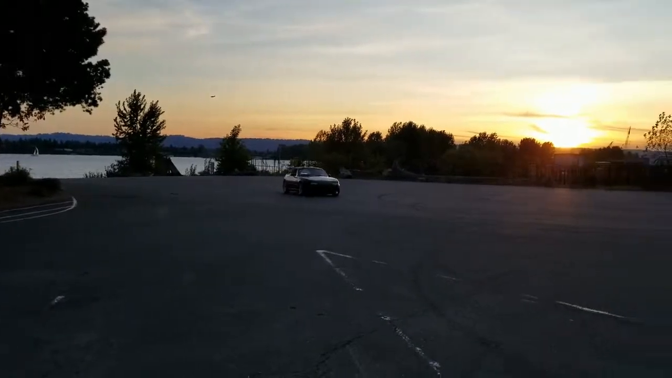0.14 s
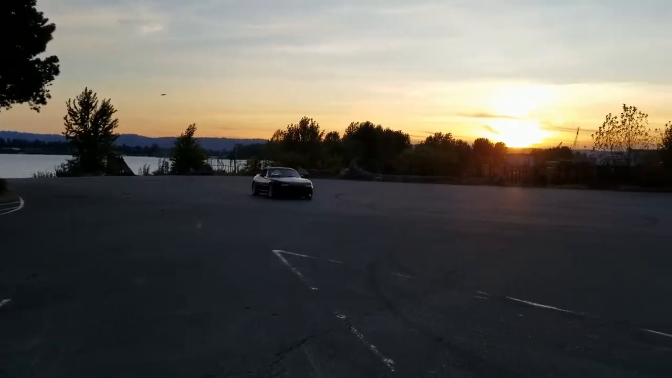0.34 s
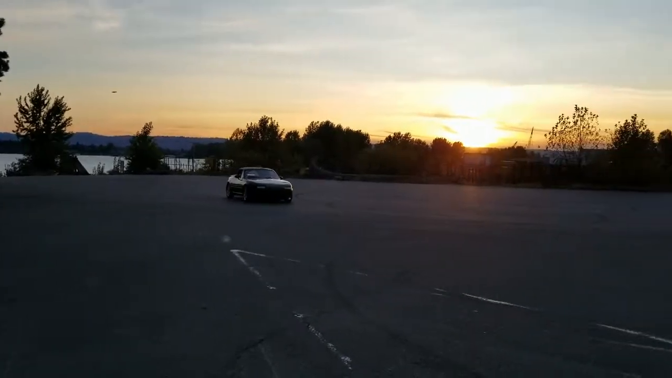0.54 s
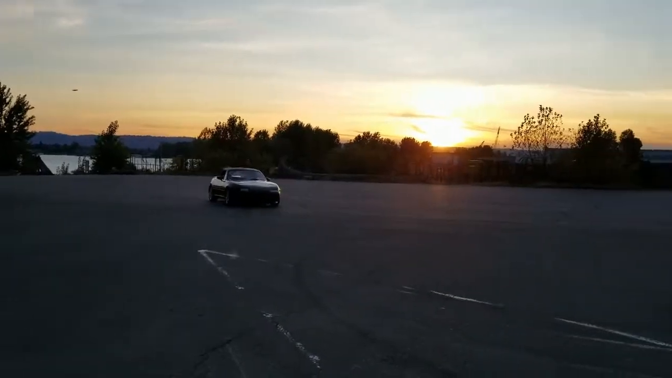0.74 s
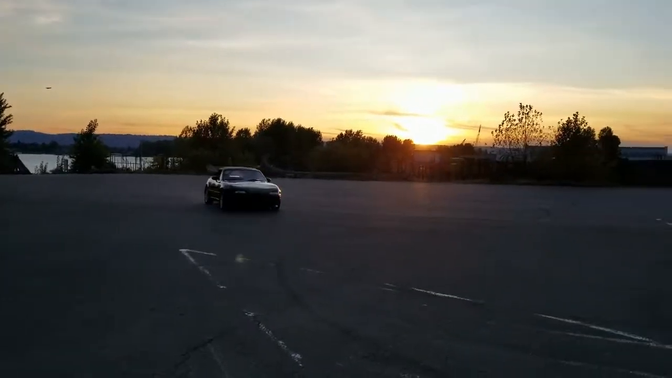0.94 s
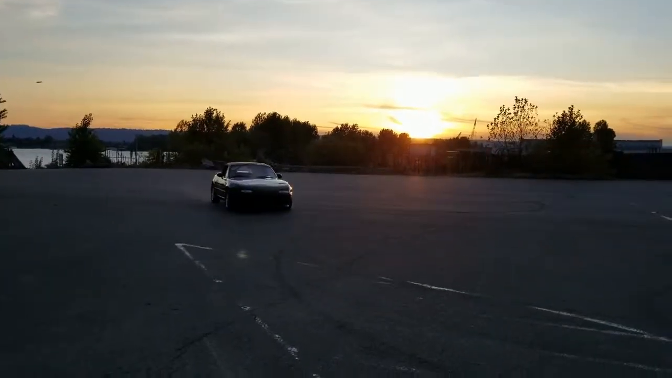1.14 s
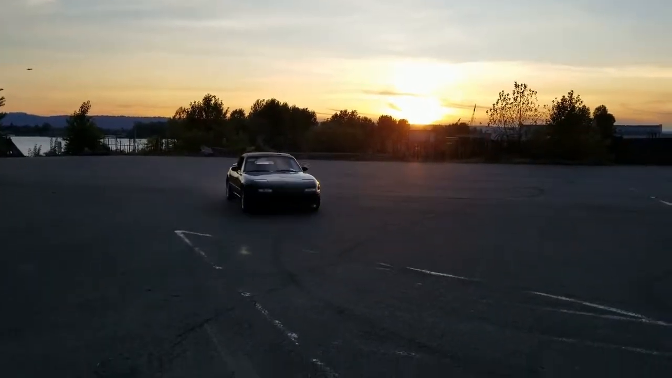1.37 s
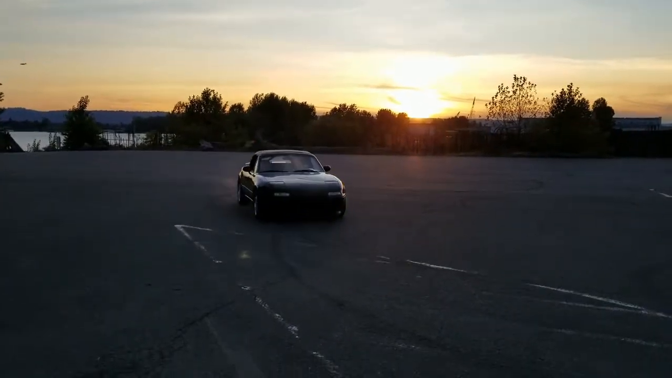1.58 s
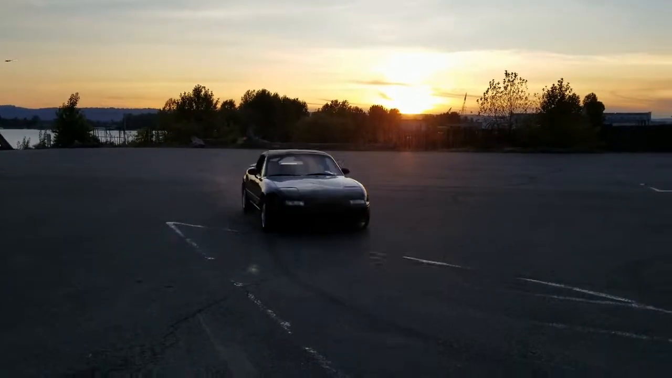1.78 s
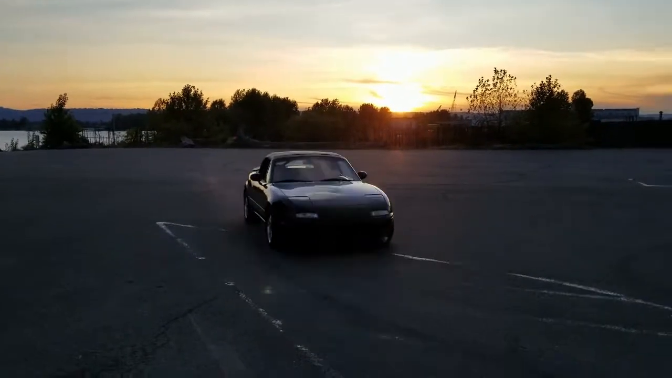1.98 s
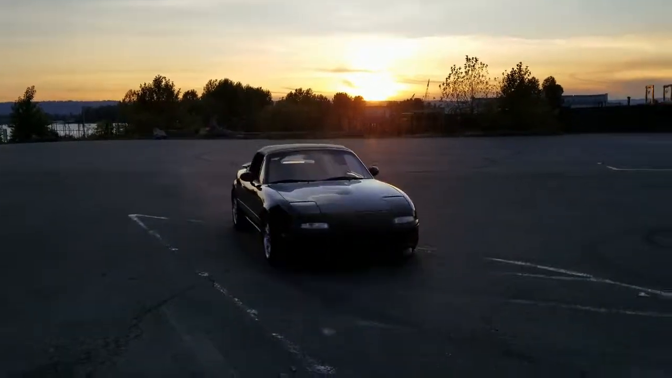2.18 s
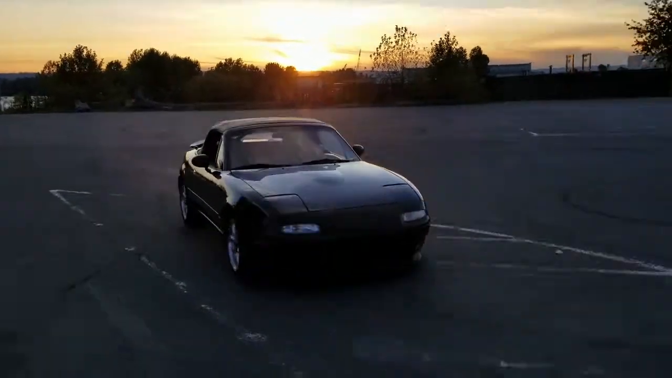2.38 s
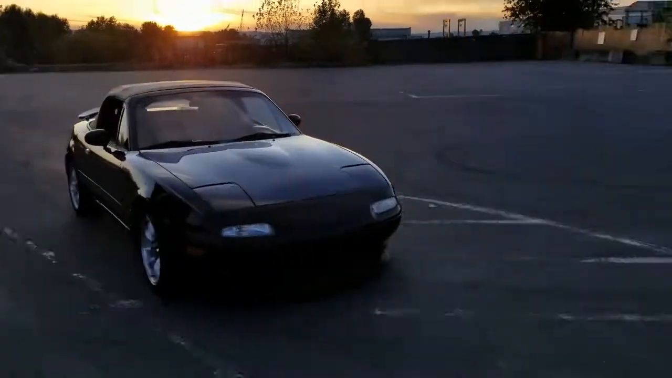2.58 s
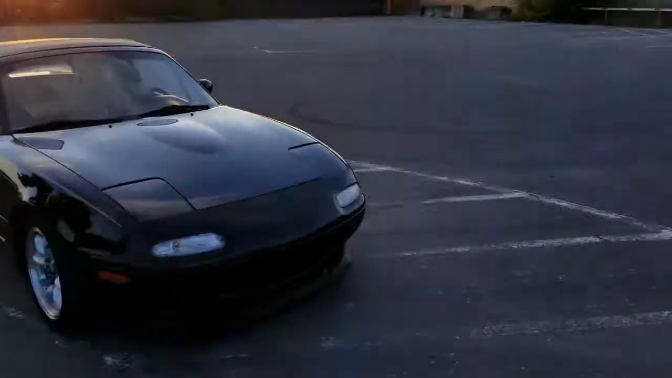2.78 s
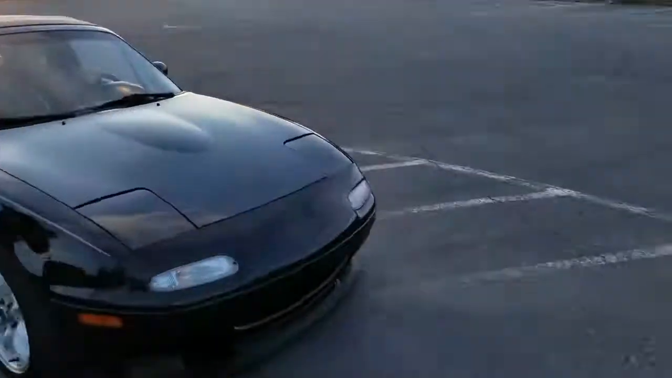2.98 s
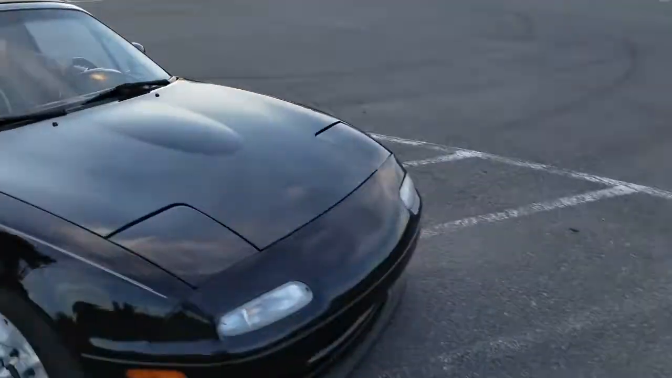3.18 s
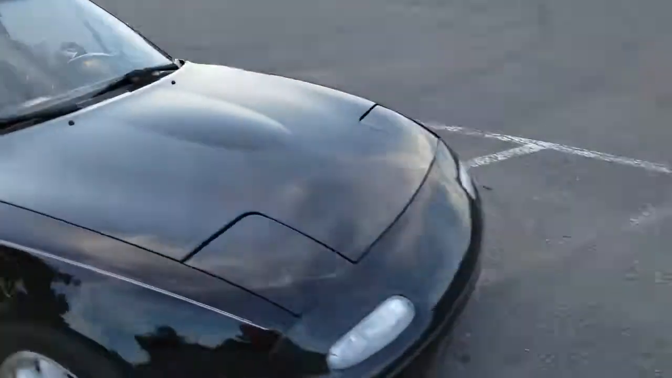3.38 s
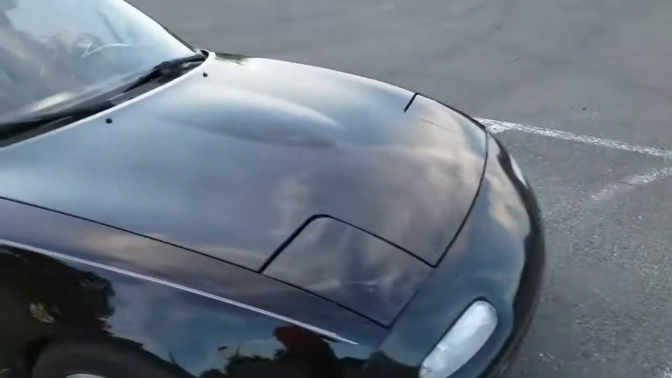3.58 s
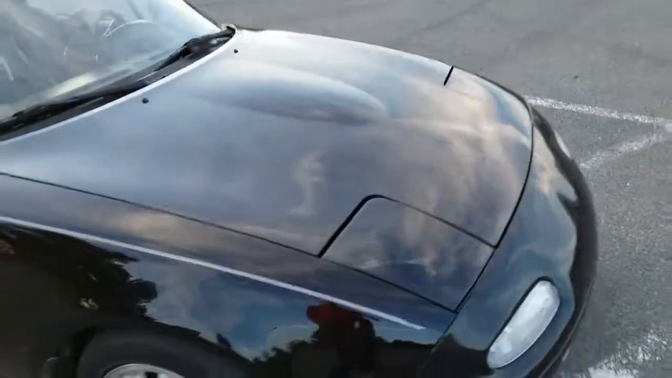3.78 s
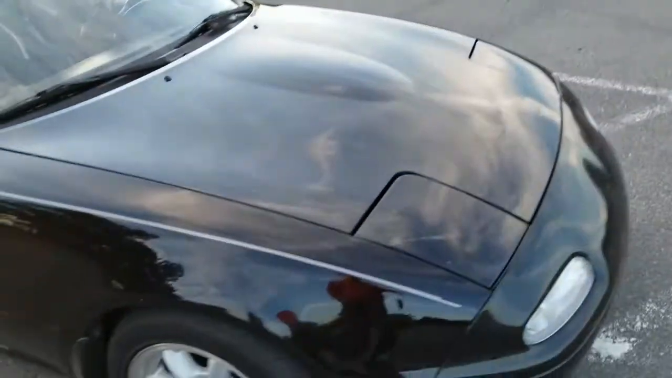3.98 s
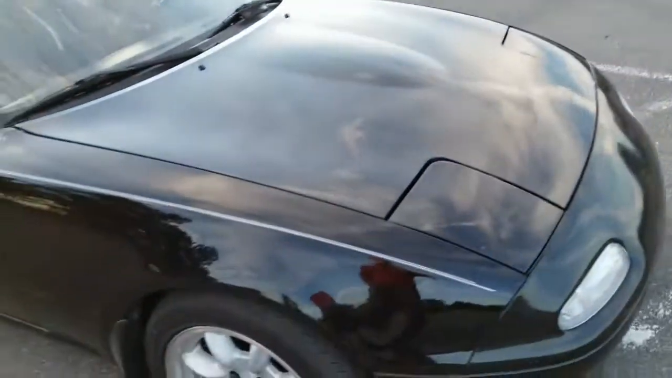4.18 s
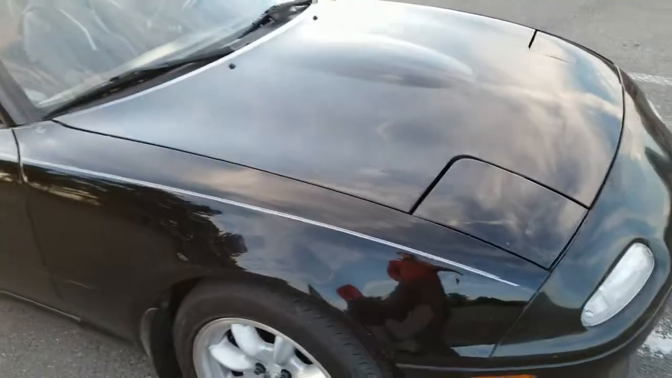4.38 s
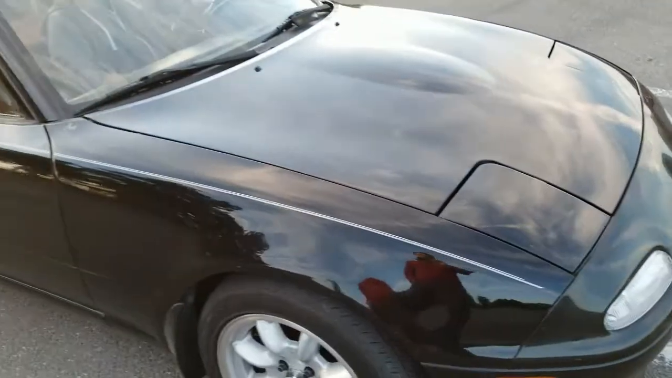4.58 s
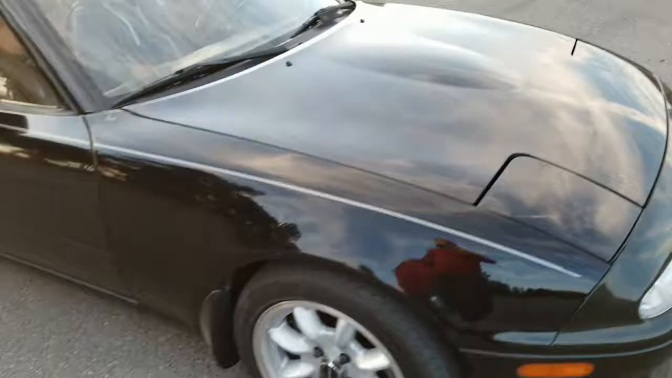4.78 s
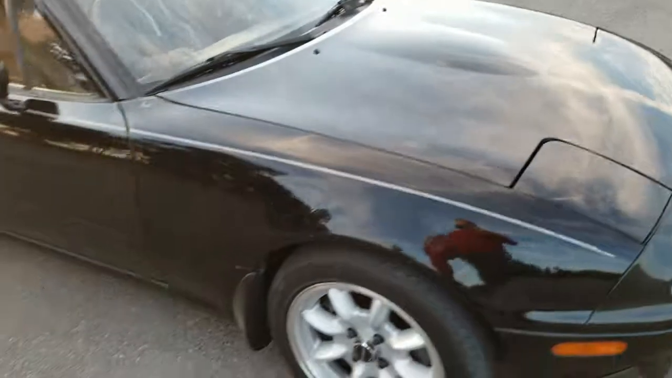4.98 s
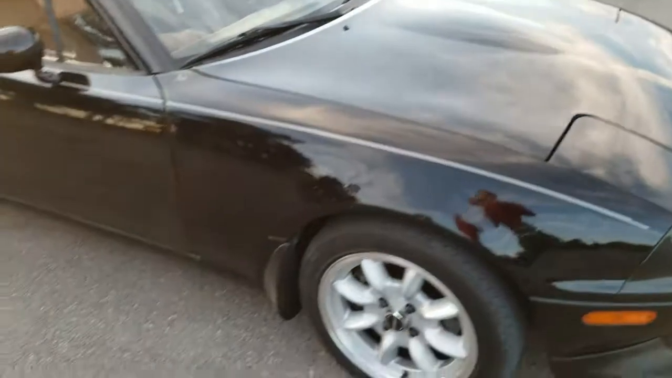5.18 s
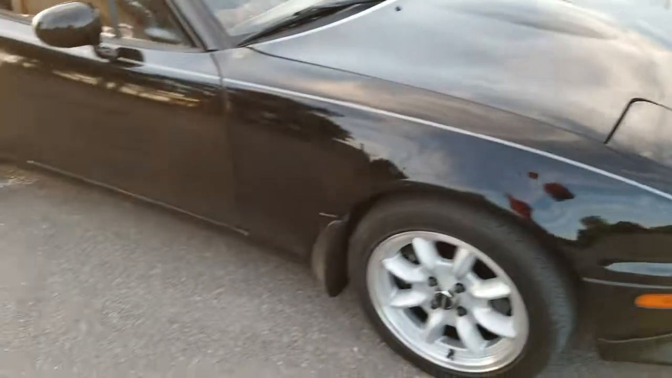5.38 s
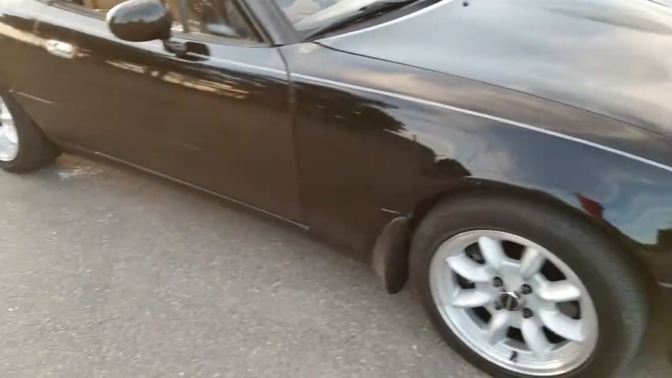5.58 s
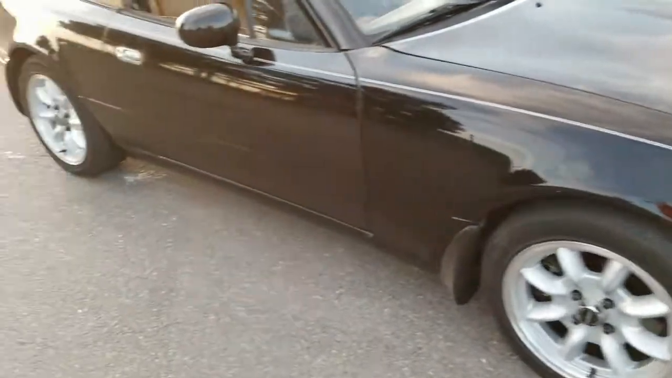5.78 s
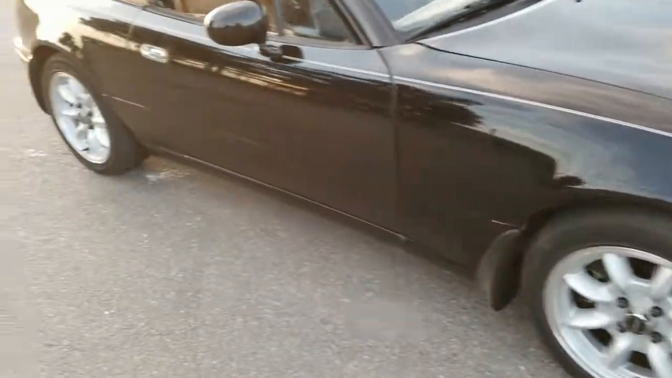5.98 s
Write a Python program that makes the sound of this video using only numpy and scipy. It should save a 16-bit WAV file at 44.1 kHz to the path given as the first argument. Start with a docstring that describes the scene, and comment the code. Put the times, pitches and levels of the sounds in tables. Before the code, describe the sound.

Low burbling engine note rises, drops as the car rolls up across an open lot, then idles unevenly nearby with hiss and a metal clack.

```python
"""Small eight-cylinder car coasting to idle

A car pulls, lifts off the throttle, coasts across an open lot and stops, idling, by a phone.
Crank-order tones and uneven firings ringing two pipes make the exhaust. Shaped noise makes the gas rasp,
tyre roll and engine-bay hiss; a pebble, clacks, whines and a squeak are short pulses and thin tones.
The two microphone ports hear the far car as one point and the near car as a wide source."""
import sys
import numpy as np
from scipy import signal
from scipy.fft import rfft, irfft
from scipy.io import wavfile
from scipy.ndimage import uniform_filter1d, map_coordinates

SR = 44100
rng = np.random.default_rng(int(sys.argv[2]) if len(sys.argv) > 2 else 0)


def digitize_waveform(pressure):
    """Quantize a signal to 16-bit integers and store it at the path in sys.argv[1].

    Rows of a 2-D input are taken as channels; values are limited to [-1, 1].
    """
    field = np.atleast_2d(pressure).T
    bounded = np.clip(field, -1, 1)
    quanta = np.round(bounded * 32767).astype(np.int16)
    wavfile.write(sys.argv[1], SR, quanta)


N = 266355
TIME = np.arange(N) / SR
PAD = 4096  # mirrored samples at each end of a filtered sound
HZ = np.fft.rfftfreq(N + 2 * PAD, 1 / SR) + 1  # 1 Hz up, so that its log and inverse exist
THROTTLE_SHUTS = (0.692, 0.07)  # start_s, length_s


def undb(db):
    """Decibels to gain."""
    return 10 ** (np.asarray(db) / 20)


def unit(x):
    """Scale to rms 1."""
    return x / np.sqrt(np.mean(x ** 2))


def curves(table):
    """Columns of a table, joined by straight lines in time."""
    s, *columns = np.transpose(table)
    return [np.interp(TIME, s, column) for column in columns]


def ramp(start_s, length_s):
    """Rise from 0 to 1 in a straight line."""
    return np.clip((TIME - start_s) / length_s, 0, 1)


def walk(rate_hz):
    """Random levels slewed from one to the next at a given rate; spread near 1."""
    hold = int(SR / rate_hz)
    steps = np.repeat(rng.standard_normal(N // hold + 1), hold)
    return 1.56 * uniform_filter1d(steps, hold)[:N]


def shape(x, response):
    """Multiply the spectrum; mirrored ends keep the edges quiet."""
    spectrum = rfft(np.pad(x, PAD, "reflect"))
    return irfft(spectrum * response, N + 2 * PAD)[PAD:-PAD]


def colour(x, points):
    """Equalise through (hz, gain_db) points on a log frequency axis."""
    hz, db = np.transpose(points)
    return shape(x, undb(np.interp(np.log(HZ), np.log(hz), db)))


def ring(x, modes, order=1):
    """Causal resonances (hz, width_hz, gain_db) summed in alternating polarity."""
    response = 0
    for k, (hz, width, db) in enumerate(modes):
        detune = (HZ / hz - hz / HZ) * hz / width
        response = response + (-1) ** k * undb(db) / (1 + 1j * detune) ** order
    return shape(x, response)


def ringing(modes, flicker_db):
    """Sheet-metal resonances shaken by noise, each flickering in level alone."""
    total = np.zeros(N)
    for mode in modes:
        body = unit(ring(rng.standard_normal(N), [mode]))
        total += body * undb(mode[2] + flicker_db * walk(30))
    return total


def strikes(table):
    """One impulse for each (start_s, peak_db) row."""
    x = np.zeros(N)
    for s, db in table:
        x[int(s * SR)] = undb(db)
    return x


def tone(table, waver, octave_db):
    """A thin tone of wavering pitch and its octave along the table's rows, silent outside them."""
    hz, db = curves(table)
    on = (TIME > table[0][0]) & (TIME < table[-1][0])
    phase = 2 * np.pi * np.cumsum(hz * (1 + waver * walk(60))) / SR
    wave = np.sin(phase) + undb(octave_db) * np.sin(2 * phase)
    return on * np.sqrt(2) * undb(db) * wave


def tyre_roll():
    """Tyres on tarmac: coloured noise with flickering underbody resonances."""
    # loudness of the roll: start_s, level_db
    roll_level = [(0, -40), (.4, -37.5), (1.6, -39.5), (2.4, -41), (3.2, -47.5), (3.6, -52), (6.04, -62)]
    # colour of tyre noise: hz, gain_db
    roll_colour = [(210, -31), (350, 1), (620, 0), (824, -11), (1150, -6.5), (1460, -17.5), (1790, -11.5),
                   (2040, -21.5), (2280, -15.5), (3280, -16), (5530, -25.5), (5990, -22), (8620, -50),
                   (13000, -35), (15500, -43)]
    # underbody resonances: hz, width_hz, gain_db
    underbody = [(1180, 130, -15.5), (2276, 110, -20.5), (3206, 47, -22), (5800, 140, -29.5),
                 (6750, 85, -27), (7040, 120, -27.5), (7670, 190, -29.5)]
    roll = unit(colour(rng.standard_normal(N), roll_colour)) * undb(0.94 * walk(22))
    return (roll + ringing(underbody, 2.1)) * undb(curves(roll_level)[0])


def engine_bay(turns):
    """Engine-bay hiss: noise with valve-gear chatter in its treble, plus ringing covers and brackets."""
    # loudness of the bay: start_s, level_db
    bay_level = [(0, -71), (.5, -53), (1, -46), (2, -40.5), (2.8, -38), (3.6, -41), (5, -41.5), (6.04, -39)]
    # colour of bay noise: hz, gain_db
    bay_colour = [(210, -35), (350, 4), (397, -7), (423, 1), (537, -6.5), (681, -9), (936, -17),
                  (1150, -17), (1370, -18), (2170, -22.5), (4500, -26.5), (5710, -25.5), (8350, -42.5),
                  (12600, -27), (15500, -35)]
    # covers and brackets: hz, width_hz, gain_db
    tinware = [(722, 200, -11), (1122, 29, -20), (2305, 580, -14.5), (3036, 180, -22.5), (3544, 60, -27),
               (5900, 200, -22.5), (7450, 210, -24.5)]
    bay = unit(colour(rng.standard_normal(N), bay_colour))
    treble = colour(bay, [(2500, -23), (6000, 0)])
    top = colour(bay, [(8000, -30.5), (10500, -4.5)])
    # the valve gear chatters twice a turn, unevenly
    twice_a_turn = 2.0 * np.cos(4 * np.pi * turns)
    treble_chatter = undb(twice_a_turn + 2.0 * walk(110))
    top_chatter = undb(twice_a_turn + 2.0 * walk(110))
    hissing = (bay - treble) * undb(1.4 * walk(20))
    hissing += (treble - top) * treble_chatter + top * top_chatter
    return (hissing + ringing(tinware, 3.53)) * undb(curves(bay_level)[0])


def gas_rasp(turns, crank_hz):
    """Gas under throttle: noise that puffs once a firing, with flickering tailpipe resonances."""
    # colour of the gas: hz, gain_db
    rasp_colour = [(530, -41.5), (900, -15), (1040, 2), (1510, -36), (2120, -9.5), (3180, -7), (3880, -13),
                   (4470, -13.5), (6000, -31), (7800, -62), (13200, -120)]
    # tailpipe resonances: hz, width_hz, gain_db
    tailpipe = [(1000, 73, -8), (1135, 64, -8.5), (2050, 120, -11), (2620, 99, -11), (3260, 70, -11),
                (3780, 60, -9)]
    start_db, db_per_hz = -48, 0.94  # level at the opening crank speed, and its rise with speed
    depth = 0.79  # part of the noise amplitude that puffs
    puff = np.exp(-(4 * turns % 1) / 0.41)  # decays over each quarter turn
    gas = (1 - depth + depth * puff) * rng.standard_normal(N)
    rasp = unit(colour(gas, rasp_colour)) * undb(2 * walk(45)) + ringing(tailpipe, 2.9)
    level_db = start_db + db_per_hz * (crank_hz - crank_hz[0])
    return rasp * undb(level_db) * (1 - ramp(*THROTTLE_SHUTS))


def hiss(turns, crank_hz):
    """The broadband noise of the car, with fresh random noise on each call."""
    return tyre_roll() + engine_bay(turns) + gas_rasp(turns, crank_hz)


def pebble_snap():
    """A pebble snaps under a tyre: a very short damped 2200 Hz wave."""
    # the snap: start_s, peak_db
    pebble = [(1.83, -20)]
    t = np.arange(SR // 8) / SR
    snap = np.cos(2 * np.pi * 2200 * t) * np.exp(-t / 0.00024)
    return signal.fftconvolve(strikes(pebble), snap)[:N]


def metal_clacks():
    """Metal clacks in the car: damped modes and a short noise crack with a softened onset."""
    # the clacks: start_s, peak_db
    clack_hits = [(4.2433, -53), (4.4214, -37), (4.4794, -48), (5.3015, -23.5)]
    # modes of the metal: hz, gain_db, t60_s
    clack_modes = [(1760, 3, .07), (2196, 13, 0.05), (2600, 5, .02), (3120, 15, 0.05), (3500, 6, .02),
                   (3950, 9, .03), (4300, 3, 0.03), (5000, 0, 0.02)]
    t = np.arange(SR // 8) / SR
    modes = sum(undb(db) * np.sin(2 * np.pi * hz * t) * 1000. ** (-t / t60) for hz, db, t60 in clack_modes)
    crack = undb(16) * np.diff(rng.standard_normal(len(t) + 1)) * np.exp(-t / 0.008)
    clack = (modes + uniform_filter1d(crack, size=6)) * (1 - np.exp(-t / 0.0027))
    return signal.fftconvolve(strikes(clack_hits), clack / clack.max())[:N]


def whines_and_squeak():
    """Thin gliding tones of wavering pitch, each with a faint octave."""
    # a gear whine: start_s, pitch_hz, level_db
    gear_whine = [(1.25, 1870, -70), (1.5, 1824, -66), (1.85, 1735, -48), (1.95, 1750, -83)]
    # a brief squeak: start_s, pitch_hz, level_db
    squeak = [(5.39, 2830, -56), (5.43, 2760, -49), (5.45, 2730, -39), (5.46, 2710, -41),
              (5.468, 2700, -70)]
    # a high whine while coasting: start_s, pitch_hz, base_level_db
    high_whine = [(.72, 3190, -66), (.85, 3200, -59.5), (1.2, 3210, -58), (1.55, 3200, -69)]
    # a belt-driven pump at idle: start_s, pitch_hz, base_level_db
    pump_whine = [(3.4, 1125, -70), (3.9, 1120, -60), (4.8, 1121, -62), (6.04, 1110, -67)]
    steady = tone(gear_whine, 0.006, -28) + tone(squeak, 0.006, -15)
    high = tone(high_whine, 0.004, -41) * undb(2.5 * walk(14))
    pump = tone(pump_whine, 0.012, -40) * undb(4.1 * walk(5))
    return steady + high + pump


def firing_pulses(turns):
    """Four firings a turn, uneven in strength and timing, as a train of rms 1."""
    # strength of each firing in the eight-cylinder cycle: gain_db
    cylinder_db = [-5, -5.5, -2, -8.5, -8.5, -3.5, -5, -3.5]
    count = np.arange(1, int(4 * turns[-1]))
    strength_chance, timing_chance = rng.standard_normal((len(count), 2)).T
    size = undb(np.array(cylinder_db)[count % 8] + 1.5 * np.clip(strength_chance, -2, 1.5))
    at = np.searchsorted(4 * turns, count + 0.146 * timing_chance)
    pulses = np.zeros(N)
    # taking off most of the mean leaves mainly the unevenness
    np.add.at(pulses, np.clip(at, 0, N - 1), size - 0.83 * size.mean())
    # fewer firings a second at idle: each one is stronger for the same level
    return unit(pulses / np.sqrt(np.gradient(turns)))


def driven(pulses, noise_db, modes):
    """Steep resonances driven by firings and turbulent gas noise, at rms 1."""
    return unit(ring(pulses + undb(noise_db) * rng.standard_normal(N), modes, order=2))


def pipes_and_block(turns):
    """One train of firings drives the short pipes, the long pipe and the engine block."""
    # short pipes' burble and long pipe's boom: start_s, burble_level_db, boom_level_db
    pipe_levels = [(0, -27.5, -25.5), (.65, -28.5, -27.5), (1.85, -31.5, -28), (2.45, -27, -25.5),
                   (3, -30, -24), (3.5, -25.5, -26.5), (3.9, -30.5, -28), (6.04, -29.5, -25)]
    # short pipes: hz, width_hz, gain_db
    short_pipes = [(206, 67.3, 6), (249.7, 46.5, 3.5), (297.2, 56, 0), (400, 67, -23), (655, 174, -19.5)]
    # long pipe: hz, width_hz, gain_db
    long_pipe = [(59.5, 42, 3), (105.8, 38, 1), (137.1, 23, 1.5)]
    # engine block: hz, width_hz, gain_db
    block_modes = [(650, 120, 2.5), (780, 140, -3)]
    pulses = firing_pulses(turns)
    burble_db, boom_db = curves(pipe_levels)
    burble = driven(pulses, 0.5, short_pipes) * undb(burble_db)
    boom = driven(pulses, -1.5, long_pipe) * undb(boom_db)
    # the block is heard once the phone is by the bonnet
    block = driven(pulses, 3, block_modes) * undb(-50) * ramp(3.92, 0.53)
    return burble + boom + block


def strong_thumps():
    """Single strong firings: the long pipe swings out, in and out again."""
    # the thumps: peak_s, peak_db
    thump_hits = [(3.497, -10.5), (3.535, -17), (3.714, -15), (4.785, -14.5), (4.843, -24), (5.503, -14.5),
                  (5.676, -12.5), (5.706, -11.5), (5.856, -6.5), (5.897, -17), (5.977, -17)]
    t = np.arange(-SR // 30, SR // 30 + 1) / SR
    swing = np.cos(2 * np.pi * 95 * t) * np.exp(-(t / 0.0081) ** 2)
    return signal.fftconvolve(strikes(thump_hits), swing, "same")


def crank_notes(turns, crank_hz):
    """Each crank order has its strength in each state of the engine and sounds as the exhaust passes it."""
    # clean notes: crank_order, pulling_db, dragged_db, running_free_db
    order_levels = [(1.5, -42, -20.5, -30), (3, -59, -14, -34), (4, -14, -22, -14), (5, -56, -36, -28),
                    (6, -48, -41.5, -32.5), (7, -39.5, -35, -53), (8, -38, -35.5, -34.5),
                    (11, -50, -46.5, -41), (12, -48, -52, -32.5), (15, -50, -40, -44), (16, -33, -35, -50)]
    # how the exhaust passes a steady note: hz, gain_db
    passage = [(40, -35), (58, -18.5), (68, -13), (84, -6.5), (100, -1), (113, 0), (120, -4.5), (128, -9.5),
               (160, -12.5), (200, -9), (245, -0.5), (290, -1.5), (320, -17.5), (570, -33), (625, -11.5),
               (680, -12)]
    # the notes swell and sag: start_s, gain_db
    swell = [(0, 2), (.15, -2), (1.1, -1), (1.2, 0), (1.5, 0.5), (1.6, -2), (1.75, -1), (2.82, 1), (2.9, 1),
             (2.98, -3), (3.04, 5.5), (3.18, -5.5), (3.3, 2.5), (3.35, -3.5), (3.39, 6), (3.46, -5),
             (3.54, 5.5), (3.62, -2.5), (4.6, 0.5), (5.4, -3.5), (6.04, 2)]
    # the engine pulls, is dragged by the coasting car, then runs free down to idle
    pulling = 1 - ramp(*THROTTLE_SHUTS)
    dragged = ramp(0.55, 0.31) * (1 - ramp(2.365, 0.28))
    running_free = ramp(2.33, 0.3)
    states = [pulling, dragged, running_free]
    hz, db = np.transpose(passage)
    notes = np.zeros(N)
    for order, *state_db in order_levels:
        passed_db = np.interp(np.log(order * crank_hz), np.log(hz), db) + 1.14 * walk(12)
        strength = undb(state_db) @ states * undb(passed_db)
        notes += strength * np.sin(2 * np.pi * order * turns)
    return np.sqrt(2) * notes * undb(curves(swell)[0])


def exhaust(turns, crank_hz):
    """Clean crank-order notes over uneven firings that ring the pipes and block, with single thumps."""
    return crank_notes(turns, crank_hz) + pipes_and_block(turns) + strong_thumps()


def scene():
    """Direct sound reaches the ports with a moving lag; the wide part of the hiss differs left and right."""
    # crank speed: start_s, crank_hz
    speed = [(0, 34.6), (.6, 39.4), (1, 40.1), (1.25, 40.1), (1.6, 39), (1.8, 37.9), (2, 36.3), (2.2, 33.5),
             (2.4, 30.2), (2.6, 27.9), (3.2, 22.8), (3.4, 20.8), (3.78, 16.7), (4.3, 16.4), (4.7, 17.2),
             (5.3, 17.5), (6.04, 16.4)]
    # place of the car: start_s, right_after_left_ms, share of treble power arriving from all round (0-1)
    bearing = [(0, .06, 0.27), (.5, .11, 0.31), (1.2, 0.096, 0.18), (2.1, 0.036, 0.57), (2.4, 0.071, 0.77),
               (3, 0.15, 0.82), (4.5, .13, 0.93), (5, -0.14, 0.95), (6.04, -.16, 0.83)]
    crank_hz = curves(speed)[0]
    turns = np.cumsum(crank_hz) / SR
    lag_ms, wide = curves(bearing)
    shared = hiss(turns, crank_hz)
    # long waves stay alike at both ports even from a wide source
    long_waves = colour(shared, [(1200, -4.0), (5000, -24.5)])
    shared = np.sqrt(1 - wide) * shared + 0.41 * np.sqrt(wide) * long_waves
    point = shared + pebble_snap() + metal_clacks() + whines_and_squeak() + exhaust(turns, crank_hz)
    # the open lot returns a little unlike bass to each port, 900 samples late
    late = np.pad(point, (900, 0), "reflect")[:N]
    lot = colour(late, [(30, -14.5), (70, -32.5), (300, -19.5), (600, -31)])
    ports = []
    for side in (1, -1):
        # half the lag in samples, forward on the left and back on the right
        heard_at = np.arange(N) + side * lag_ms * SR / 2000
        direct = map_coordinates(point, [heard_at], order=3, mode="mirror")
        around = colour(hiss(turns, crank_hz), [(400, -8.5), (2000, -2), (5000, -1)])
        ports.append(direct + side * lot + np.sqrt(wide) * around)
    return np.array(ports)


def record(dry):
    """The ports differ a little in colour and by band; the phone cuts the deep bass and the top."""
    # colour between the ports: hz, left_minus_right_db
    port_tilt = [(300, 0), (1000, .5), (2500, -0.4), (5000, -3), (9000, 0.5)]
    tilt = np.array(port_tilt)
    left = colour(dry[0], tilt * [1, 0.5])
    right = colour(dry[1], tilt * [1, -0.5])
    # the ports agree best in the low treble
    apart = colour((left - right) / 2, [(1300, 1.5), (2400, -4.5), (3800, 0.0)])
    wet = (left + right) / 2 + np.array([apart, -apart])
    wet = signal.sosfilt(signal.butter(2, 40, "high", fs=SR, output="sos"), wet)
    return signal.sosfilt(signal.ellip(12, 0.5, 80, 15640, fs=SR, output="sos"), wet)


dry = scene()
out = record(dry)
digitize_waveform(out)
```